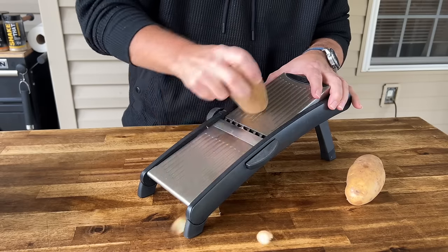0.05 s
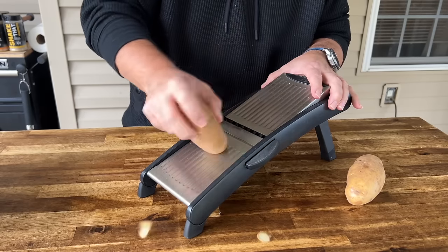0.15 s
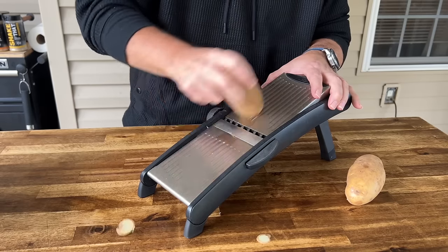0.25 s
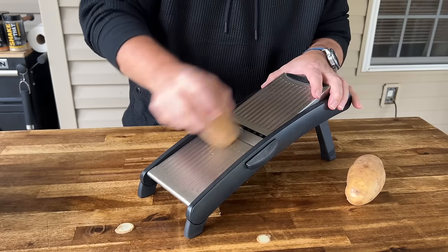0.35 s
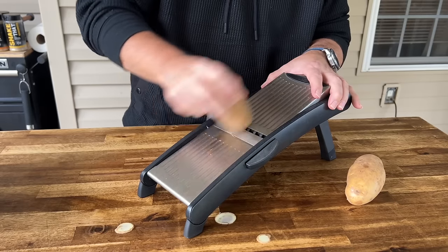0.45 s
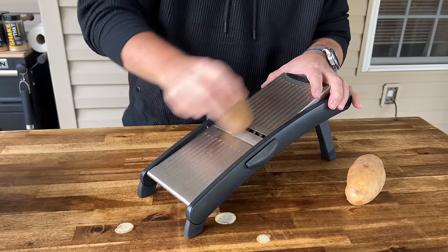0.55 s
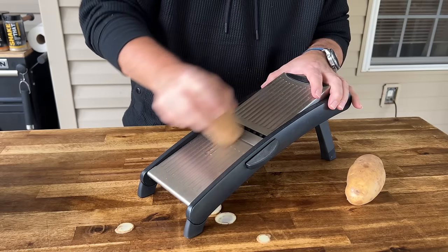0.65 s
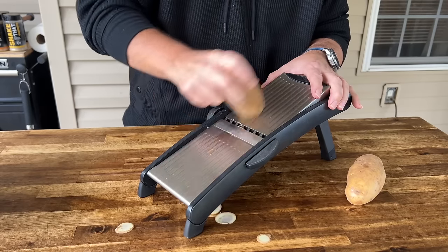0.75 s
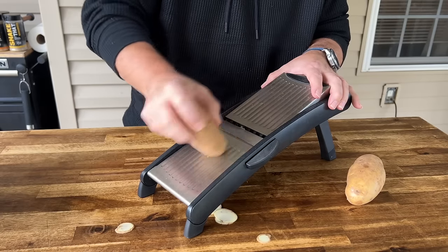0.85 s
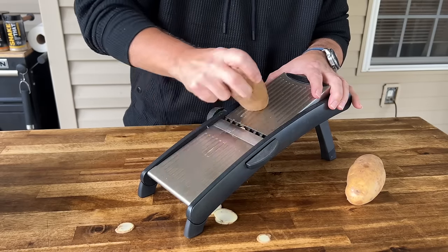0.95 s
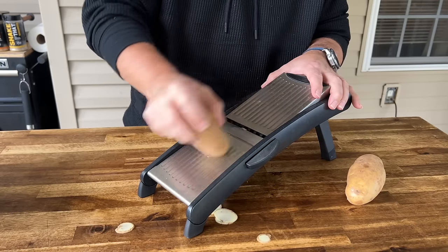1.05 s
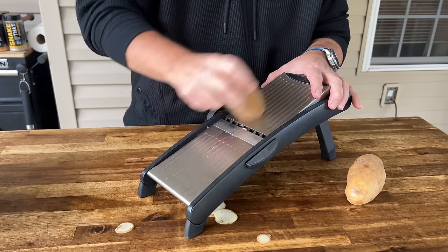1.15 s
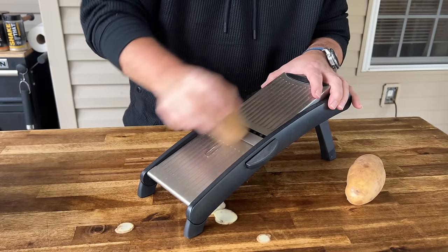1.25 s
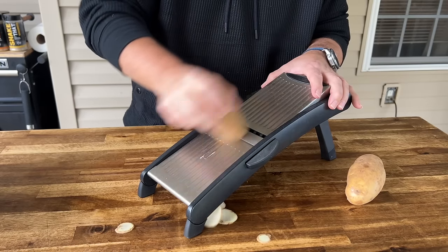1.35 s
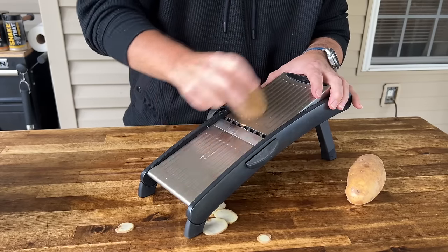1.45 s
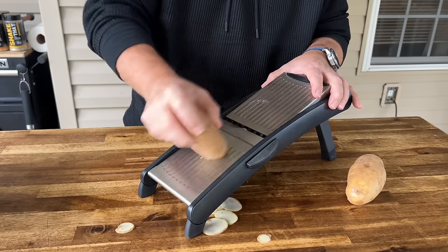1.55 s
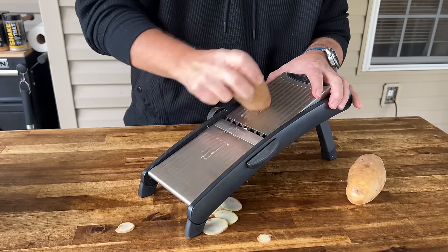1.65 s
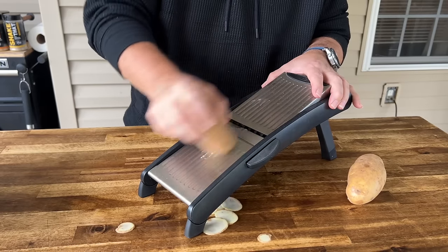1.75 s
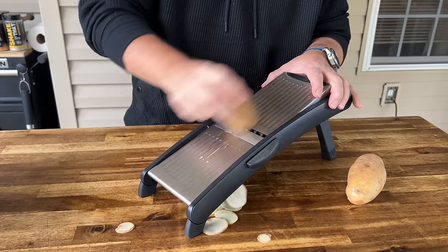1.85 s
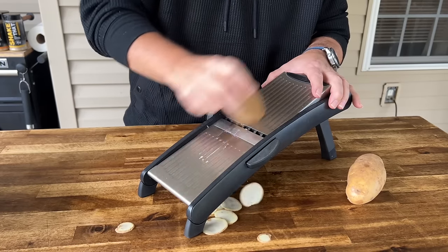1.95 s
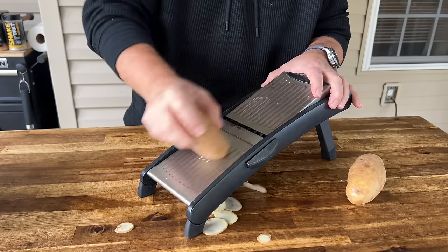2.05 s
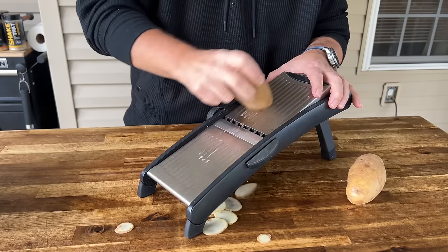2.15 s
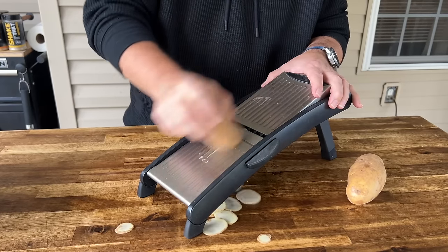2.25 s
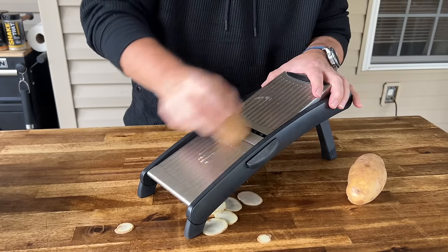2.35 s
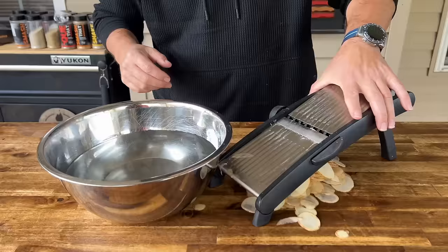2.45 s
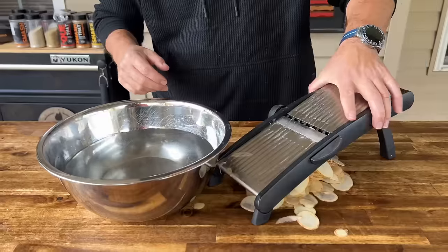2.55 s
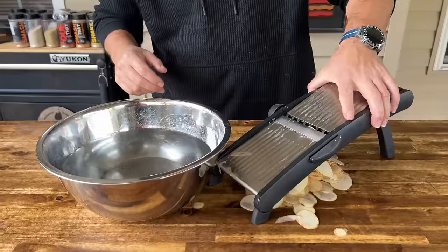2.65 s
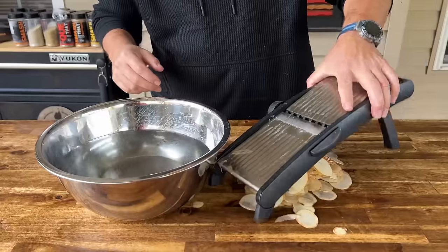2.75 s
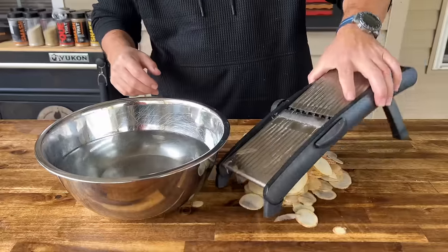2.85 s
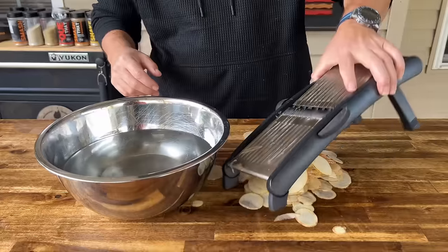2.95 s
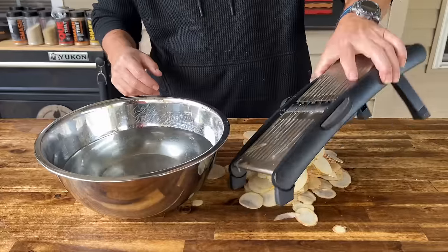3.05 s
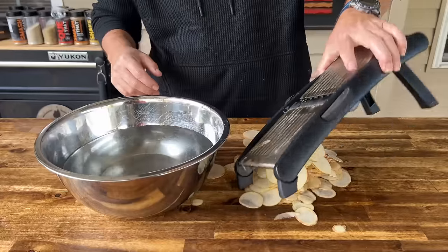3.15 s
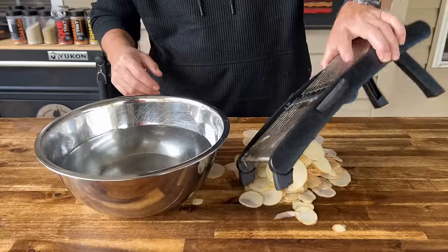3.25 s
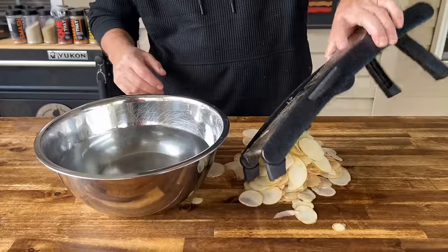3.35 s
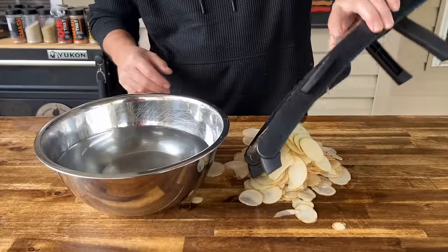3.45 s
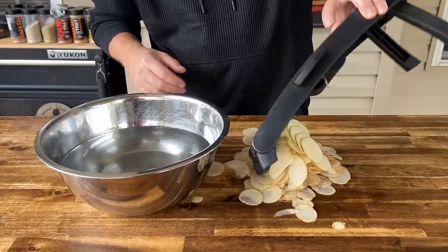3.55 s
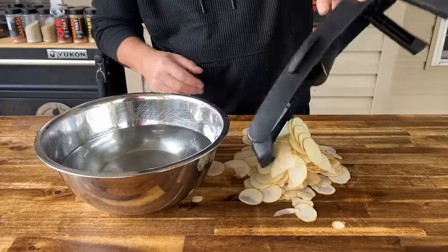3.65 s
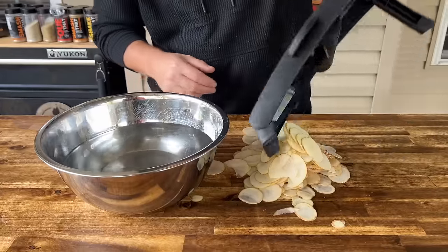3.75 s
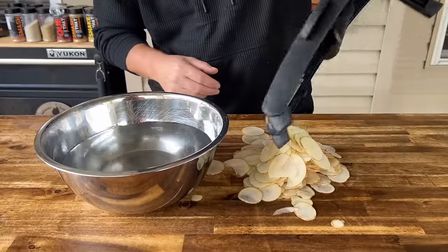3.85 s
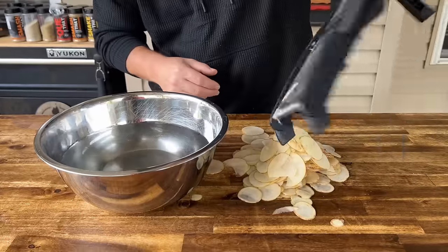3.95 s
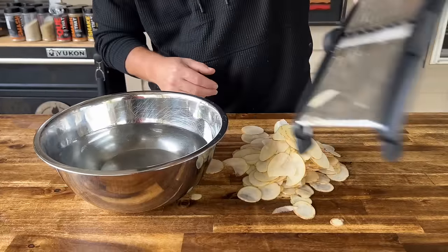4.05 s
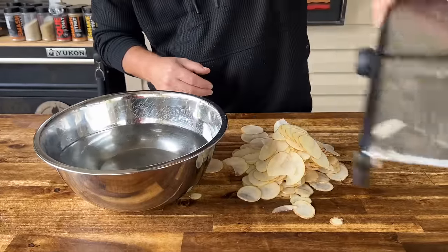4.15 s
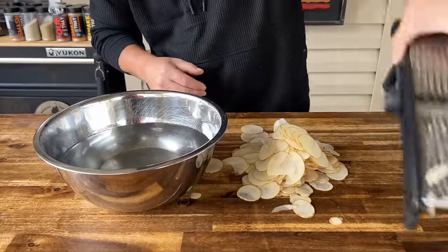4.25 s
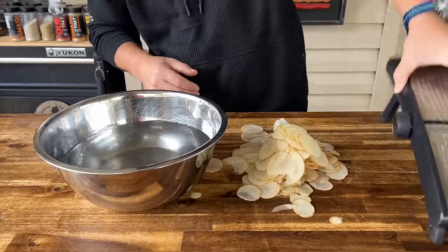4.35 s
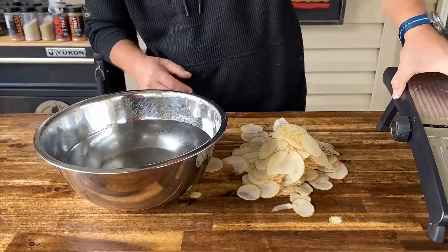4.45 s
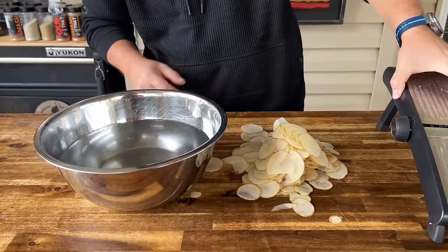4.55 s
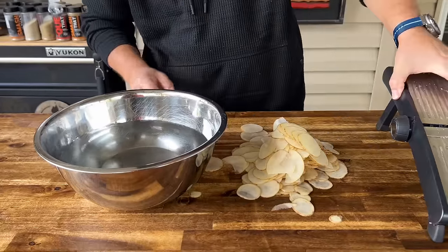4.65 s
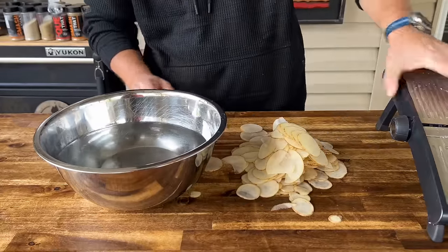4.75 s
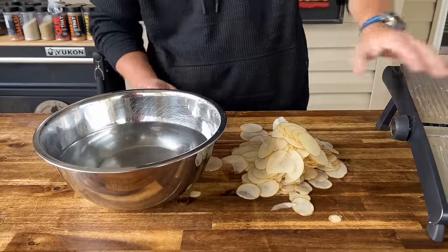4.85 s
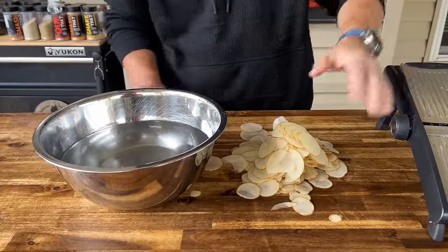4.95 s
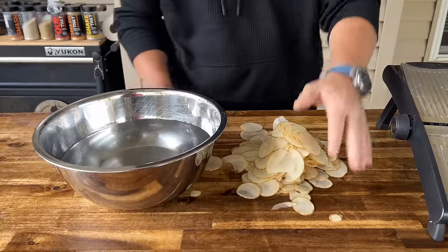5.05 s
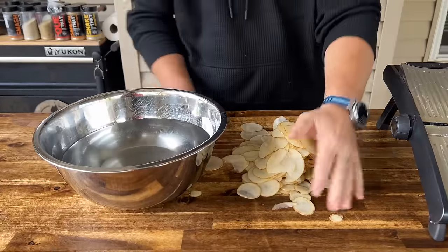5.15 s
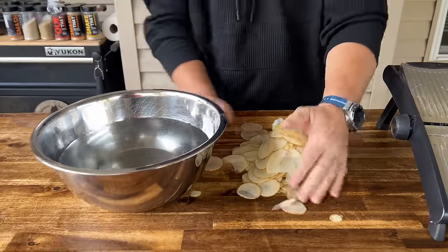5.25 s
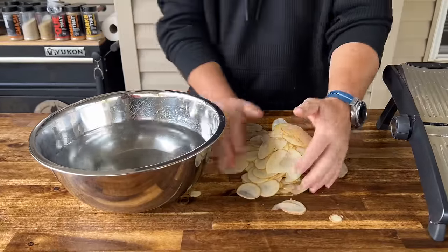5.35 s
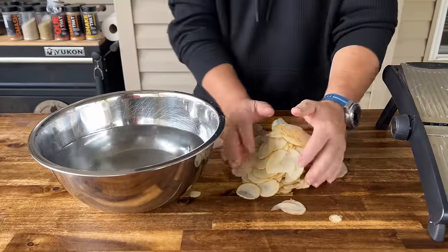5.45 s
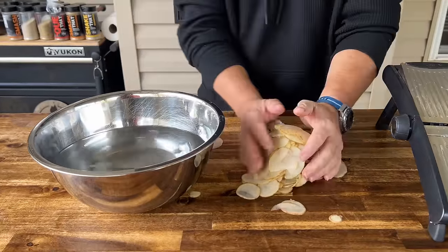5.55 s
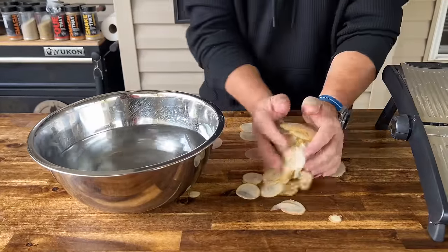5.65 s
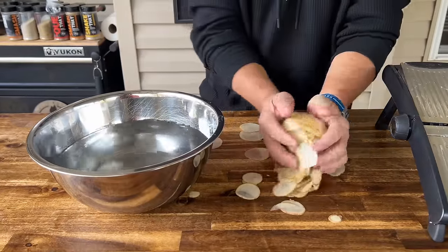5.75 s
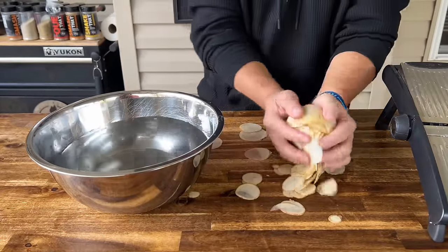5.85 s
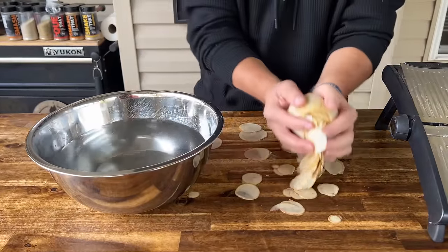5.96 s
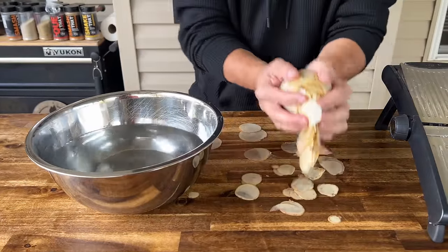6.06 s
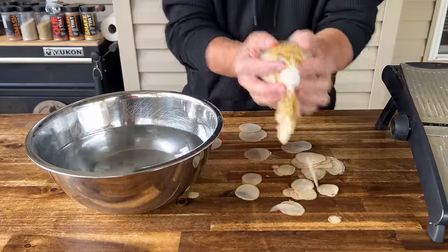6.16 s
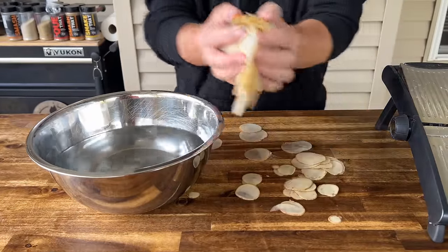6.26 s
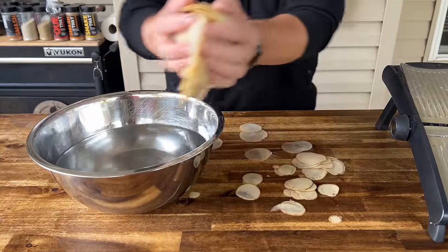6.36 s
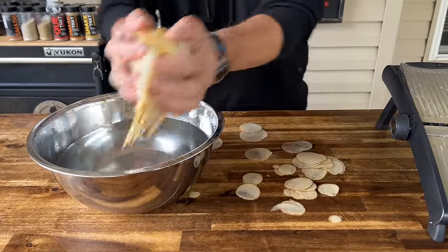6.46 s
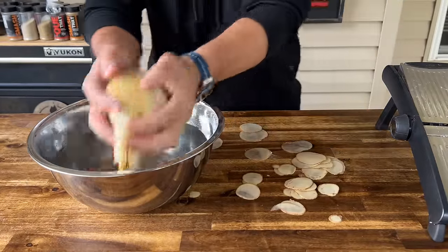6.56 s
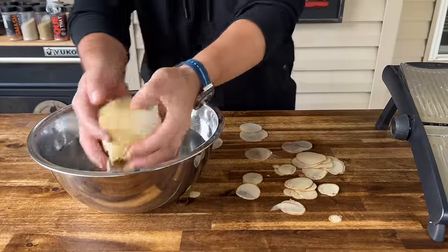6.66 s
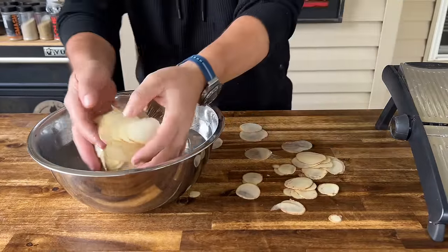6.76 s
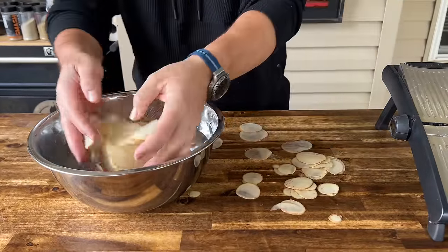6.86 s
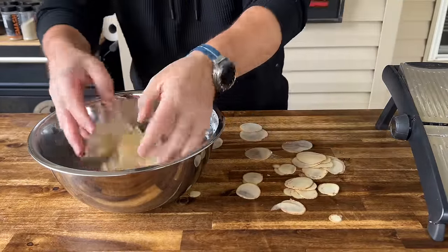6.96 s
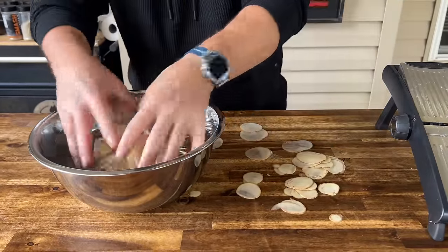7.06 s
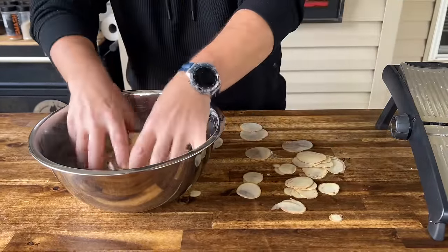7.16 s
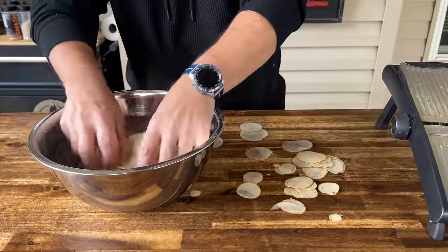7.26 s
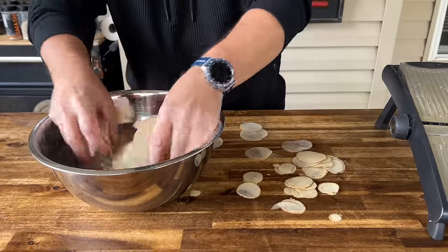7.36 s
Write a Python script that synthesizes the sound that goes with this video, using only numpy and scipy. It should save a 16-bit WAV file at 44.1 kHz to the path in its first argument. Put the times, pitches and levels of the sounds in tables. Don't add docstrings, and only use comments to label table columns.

```python
import sys
import numpy as np
from scipy import signal
from scipy.fft import rfft, irfft, next_fast_len
from scipy.io import wavfile
from scipy.ndimage import uniform_filter1d

SR = 44100
rng = np.random.default_rng(int(sys.argv[2]) if len(sys.argv) > 2 else 0)


def store_pcm(level_fs):
    pcm = np.round(np.clip(level_fs, -1, 1) * 32767).astype(np.int16)
    wavfile.write(sys.argv[1], SR, np.atleast_2d(pcm).T)


def undo_db(level):
    steps = np.asarray(level, float) / 20
    return 10 ** steps


N = 327266
SHOT_2_S = 2.49

# (frequency [Hz], level [dB])
RASP_SPECTRUM = [(150, -42), (500, -4), (900, -0.5), (1600, -10), (2600, -12.5), (3800, -5.5), (4400, -13),
                 (5000, -8.5), (6500, -15.5), (8500, -16), (11000, -19), (20000, -63)]
# (frequency [Hz], level [dB])
CUT_TINT = [(300, 2), (900, 2.5), (1600, 1), (2600, 2.5), (3700, 1.5), (4400, 3), (5200, 0.5), (8000, 1.5)]
# (frequency [Hz], level [dB])
FIZZ_SPECTRUM = [(3000, -57), (7000, -8), (9000, -1), (12500, -5.5), (15300, -2.5), (16500, -26.5)]
# (bite [s], let-go [s], bite [dB], let-go [dB], jolt [dB])
CUTS = [(0.1098, 0.129, -29.5, -15, -20.5), (0.3406, 0.357, -32.5, -13, -19),
        (0.567, 0.583, -29, -13.5, -20.5), (0.794, 0.81, -30.5, -16, -28.5),
        (1.0218, 1.0366, -33.5, -18, -32), (1.251, 1.264, -27, -19.5, -23),
        (1.493, 1.507, -29.5, -18.5, -30.5), (1.732, 1.744, -29, -19, -26.5),
        (1.983, 2, -27.5, -19.5, -23.5), (2.2413, 2.2543, -22, -18.5, -29)]
# (touch [s], clear [s], touch [dB], clear [dB])
RETURNS = [(0.004, 0.013, -26.5, -18), (0.231, 0.249, -25.5, -15), (0.46, 0.4804, -37.5, -15.5),
           (0.681, 0.702, -36, -21.5), (0.911, 0.929, -34.5, -20.5), (1.1263, 1.1582, -34, -25),
           (1.364, 1.3963, -19.5, -19), (1.607, 1.633, -40, -31.5), (1.855, 1.8795, -36, -25.5),
           (2.1007, 2.115, -14.5, -30), (2.359, 2.398, -43.5, -24)]
# (time [s], first level [dB], second level [dB])
KNOCKS = [(.003, -23.5, -20), (0.238, -39.5, -21), (.47, -30, -26.5), (.691, -31, -29), (.92, -31, -37),
          (1.133, -39, -30.5), (1.371, -36, -26), (1.624, -38, -28), (1.87, -30, -31), (2.108, -26, -28),
          (2.368, -53, -26.5)]
# (time [s], rasp [dB], fizz [dB], t60 [s])
SNAGS = [(.182, -40, -49.5, 0.061), (0.372, -12, -43.5, 0.016), (.413, -38, -37.5, 0.013),
         (.666, -34.5, -54, 0.044), (0.8622, -20, -35.5, 0.013), (1.281, -18, -42.5, .03),
         (2.383, -33.5, -48, 0.035)]
# (frequency [Hz], level [dB], t60 [s])
RAMP_MODES = [(191.8, -12, 0.24), (246, -17.5, 0.11), (342, -8.5, 0.083), (491, -8.5, 0.08),
              (630, -8.5, 0.046), (851, -9, 0.051), (981.5, -12.5, 0.076), (1390, -1.5, 0.0096)]
# (time [s], level [dB], frequency [Hz], upper mode [dB], t60 [s])
HUMS = [(0.004, -33, 407, -42.5, 0.09), (0.021, -23, 403, -42, 0.091), (0.131, -21, 407, -43, 0.087),
        (0.237, -25.5, 385, -42.5, 0.06), (0.256, -19, 409, -34, 0.066), (0.358, -20, 416, -25.5, 0.084),
        (0.469, -27, 384, -45, 0.059), (0.487, -19.5, 409, -50, 0.064), (0.583, -32, 419, -27, 0.19),
        (0.691, -28, 380, -48, 0.054), (0.708, -24.5, 409, -47, 0.076), (0.812, -22.5, 413, -26.5, 0.09),
        (0.92, -26, 394, -50, 0.059), (0.938, -26, 387, -49, 0.09), (1.041, -21, 409, -50, 0.072),
        (1.132, -30.5, 436, -44, 0.065), (1.149, -24, 402, -56, 0.052), (1.272, -20.5, 409, -34.5, 0.072),
        (1.369, -31.5, 417.6, -26, 0.2), (1.386, -24.5, 385, -46, 0.055), (1.509, -24, 410, -33, 0.053),
        (1.523, -27, 399, -50, 0.068), (1.624, -26, 395, -48, 0.068), (1.748, -24.5, 411, -27, 0.086),
        (1.87, -27, 385, -47, 0.088), (1.999, -22.5, 409, -28, 0.088), (2.108, -29.5, 428, -32, 0.043),
        (2.124, -26.5, 394, -45, 0.094), (2.257, -22, 414, -25.5, 0.1), (2.313, -44, 429, -59, 0.16),
        (2.387, -26.5, 389.5, -55, 0.1)]
# (frequency ratio, level [dB], t60 ratio)
HUM_SIDE_MODES = [(0.892, -11, 0.59), (0.462, -12, 1.3)]
# (frequency [Hz], level re rasp [dB], t60 [s])
BLADE_MODES = [(3600, -18.5, 0.022), (3820, -20.5, 0.036)]
BLADE_FREE_DB = [-6, 1, 6, 8, 5, 5, 5, 8, 4, -7, 6]
CUT_FIZZ_DB, CUT_END_FIZZ_DB = -39.5, -32
TOUCH_FIZZ_DB, CLEAR_FIZZ_DB = -18, -6
CUT_FIZZ_T60_RATIO, TOUCH_FIZZ_T60_RATIO, CLEAR_FIZZ_T60_RATIO = 0.93, 0.55, 0.61
FIZZ_RISE_S = 0.0018
JOLT_LAG_S, REBOUND_S, REBOUND_DB, KNOCK_GAP_S = 0.002447, 0.013, -5, 0.016
HARD_DB, HARD_T60_S, SOFTER_LONGER = -10, 0.026, 0.33
SLIDE_DB, RUMBLE_DB, SHAKE_DB, SHAKE_T60_S = -65, -47, -11.5, 0.12
LOAD_DB, LOAD_SHIFT = 3.5, 0.025
HUM_RISE_S, HUM_HOLD, UPPER_HZ, UPPER_T60_S = 0.0017, 1.58, 862, 0.037

# (time [s], crack peak [dB], frame ring [dB], steel tick [dB])
LANDINGS = [
    (4.3022, -18, -17.5, -42),
    (4.307, -18.5, -18, -45),
    (4.321, -12, -29, -37.5),
    (4.3493, -14.5, -31.5, -5),
    (4.4075, -13, -14, -29.5),
    (4.413, -20.5, -24, -23.5),
    (4.429, -9.5, -21, -35),
    (4.4406, -14, -29, -4.5),
    (4.679, -59.5, -46, -76.5),
]
# (frequency [Hz], level [dB])
CRACK_SPECTRUM = [(300, 5.5), (700, 1.5), (1200, 3), (1700, -1.5), (3000, -1), (4500, -6), (7000, -9.5),
                  (12000, -18.5), (15500, -25.5), (16300, -46)]
# (frequency [Hz], level [dB], t60 [s])
FRONT_MODES = [(350, -4.5, 0.11), (409, -1, 0.085), (472.8, -2, 0.041), (605, 5, 0.015), (890, -10.5, .04),
               (1235, -8, 0.028)]
# (frequency [Hz], level [dB], t60 [s])
REAR_MODES = [(214, -2.5, 0.085), (302, -11, 0.06), (401, -10.5, 0.19), (648, -1, 0.18), (694, -5, 0.067),
              (823, 2, 0.075), (970, 3.5, 0.087), (1263, -6.5, 0.057), (1530, -7.5, 0.026)]
# (frequency [Hz], level [dB])
STEEL_SPECTRUM = [(3000, -21), (5500, -8), (6400, 4), (7200, -5), (8500, -1.5), (11000, -4.5),
                  (12300, -2.5), (14500, -11), (15800, -12), (16800, -41)]
# (time [s], level [dB], frequency [Hz], t60 [s])
RINGS = [(4.303, -11.5, 392, 0.037), (4.303, -18, 628, 0.058), (4.304, -20, 300, 0.058),
         (4.316, -26, 409, 0.023), (4.35, -26, 397, 0.1), (4.321, -24, 2030, 0.04), (4.428, -24, 1180, .05),
         (4.4072, -13, 720, .04), (4.4072, -41, 930, 0.059), (4.4072, -19, 1190, .05),
         (4.428, -24, 677, 0.1), (4.428, -14.5, 1400, 0.041), (4.428, -20, 1650, 0.05),
         (4.4072, -32, 2210, .04), (4.436, -40, 920, 0.084), (4.44, -31.5, 2110, 0.083),
         (5.249, -27.5, 940, 0.017), (5.249, -44.5, 2010, 0.24), (5.249, -45, 2370, 0.094),
         (5.249, -42, 1768, 0.08), (5.25, -46, 3890, .05), (5.25, -48.5, 4580, 0.11),
         (5.264, -34, 129, 0.12), (5.273, -27.5, 613, 0.25), (5.3, -38.5, 700, 0.14),
         (5.28, -27, 416.4, 0.18), (5.266, -43, 1090, 0.05), (5.268, -47, 968, 0.12)]
# (time [s], peak [dB])
BUMPS = [(5.253, -31.5), (5.266, -29.5), (5.274, -23.5), (5.282, -24.5), (5.293, -27), (5.306, -43),
         (5.32, -30.5)]
# (frequency [Hz], level [dB], t60 [s])
COUNTER_MODES = [(97, -2, 0.17), (147, 4.5, 0.053), (302.5, -4, 0.26), (357, -5, 0.096), (483, -4.5, 0.062),
                 (673, -15.5, 0.077), (700, -8, 0.021), (830, -4, 0.029)]
REAR_STEEL_RATIO, STEEL_ECHO = 1, 0.61

# (start [s], length [s], rustle [dB], dull part relative [dB])
GESTURES = [(2.455, 0.89, -89, 22.5), (3.238, 0.66, -85.5, 12), (5.021, 0.54, -70.5, -21),
            (5.2, 0.16, -65.5, -11), (5.407, 0.38, -65, 4), (5.694, 0.29, -71.5, 13.5),
            (5.889, 0.85, -87.5, -9), (6.558, 0.23, -75, 13.5), (6.738, 0.36, -75, 23),
            (7.034, 0.39, -76, 18)]
# (frequency [Hz], level [dB])
RUB_SPECTRUM = [(1200, 7), (2500, -0.5), (4500, 1.5), (7000, -4), (11500, -2.5), (15500, -10.5),
                (16300, -35)]
# (time [s], peak [dB], centre [Hz], bright edge [dB])
TICKS = [(0.8599, -29.5, 1750, -47.5), (1.797, -37, 3800, -62.5), (2.667, -43.5, 3860, -79),
         (2.7804, -48, 5600, -61.5), (3.5909, -53, 4970, -89.5), (3.7542, -45.5, 3920, -89),
         (3.7937, -53, 3910, -77), (5.249, -25, 1990, -84), (5.8127, -43, 3740, -47),
         (5.8642, -50, 1770, -62), (5.886, -62, 2150, -82), (6.0771, -43, 4950, -75),
         (6.142, -50, 2415, -89), (6.277, -39.5, 3720, -65.5), (6.593, -51.5, 1807, -64.5),
         (6.8472, -54, 1870, -70), (6.8901, -47, 1990, -82.5), (6.956, -78, 1830, -64.5),
         (7.1213, -41, 4660, -61), (7.243, -43, 4700, -68.5), (7.3591, -55, 3810, -71)]
# (time [s], level [dB], low edge [Hz], high edge [Hz], length
# [s])
SCUFFS = [(3.66, -57, 2830, 3800, 0.097), (3.746, -63, 2180, 4400, 0.071), (4.601, -65, 4870, 5970, 0.14),
          (5.243, -48, 2800, 5560, 0.075), (5.75, -62, 2994, 6300, 0.11), (6.272, -70, 1800, 6500, 0.028),
          (6.656, -56, 2540, 10600, 0.051), (6.779, -68, 1820, 4700, 0.42), (7.26, -74, 1690, 2480, 0.018),
          (7.243, -63, 1836, 9500, 0.069)]
# (time [s], peak [dB], frequency [Hz], t60 [s])
PLOPS = [(6.772, -46.5, 605, 0.12), (6.785, -39.5, 910, 0.04), (6.875, -40, 1940, 0.02),
         (6.895, -24, 674, 0.0085), (6.901, -37, 760, 0.028), (6.914, -34.5, 770, 0.023),
         (6.939, -51.5, 1230, 0.024), (7.224, -48.5, 2670, 0.018), (7.24, -52, 1540, 0.036),
         (7.266, -47, 1970, 0.054)]
# (time [s], level [dB], frequency [Hz], t60 [s])
PIPS = [(2.36, -43.5, 2600, 0.022), (2.666, -53, 1286, 0.056), (2.666, -60, 3900, .03),
        (2.783, -61, 7950, .02), (2.97, -62, 1290, 0.12), (3.753, -57.5, 4230, 0.037),
        (3.753, -64, 8100, 0.027), (3.793, -58, 4310, .04), (5.218, -53.5, 5360, 0.066),
        (5.63, -54, 4900, 0.034), (5.69, -50, 4960, .03), (5.704, -57, 5060, .02),
        (5.768, -56, 4830, 0.022), (5.8314, -47, 3640, .02), (5.8643, -47.5, 1800, 0.018),
        (5.8892, -45.5, 8170, 0.014), (6.278, -53.5, 2110, 0.024), (6.81, -56, 1505, 0.013),
        (6.83, -59.5, 2900, .012), (6.888, -38.5, 1400, 0.018), (6.93, -63, 2400, 0.011),
        (6.997, -55, 1100, 0.02), (6.849, -57.5, 8010, 0.011), (6.952, -48, 7300, .012),
        (6.96, -53, 4090, .012), (6.967, -50, 5280, 0.02), (7.05, -62, 4400, 0.015),
        (7.242, -47.5, 3130, 0.017), (7.258, -60, 7800, .012), (7.326, -54, 1230, 0.019),
        (7.355, -55, 4160, 0.01), (7.376, -68, 7170, 0.015), (7.39, -58.5, 6500, .012)]
SOFT_ENDS = 0.66
TICK_T60_S = 0.03

# (peak [s], deep level [dB], build-up over 20 dB [s], upper puff relative [dB])
GUSTS = [(2.54, -40.5, 1.2, -11), (3.24, -38, 0.58, -4), (3.187, -25.5, 0.08, -6), (3.09, -35, 0.23, 0.5),
         (3.629, -47, 0.1, -8), (4.12, -50.5, -0.35, -6.5), (4.44, -45.5, -0.6, 6.5),
         (4.818, -42.5, 0.1, 0.5), (5.0, -62.5, -5, 4.5), (5.28, -64.5, 0, -1.5), (5.502, -53.5, 0.5, 0),
         (5.95, -65, 2, 3), (6.12, -57.5, 0, -16), (6.429, -54.5, -1, -5), (6.9, -54.5, 4.5, -9.5),
         (7.4, -54.5, 3.5, -2)]
DROP_RATIO = 0.38
# (time [s], level [dB], start [Hz], end [Hz], length [s])
CHIRPS = [(2.702, -56, 4080, 5780, 0.015), (3.641, -57, 4480, 5250, 0.016),
          (5.927, -58.5, 4500, 5650, 0.015), (6.013, -55.5, 4320, 5350, 0.022),
          (6.366, -70, 4400, 5050, 0.076), (6.991, -60, 4460, 4840, 0.017), (7.179, -61, 4540, 5420, 0.037)]
# (level [dB], start [Hz], end [Hz], length [s])
WHISTLE = (-57.5, 5601, 7890, 0.035)
# (level [dB], start [Hz], end [Hz], length [s])
PEEP = (-78, 3145, 2444, 0.195)
CHIRP_ECHO_S, CHIRP_HOARSE_HZ = 0.38, 416
WHISTLE_S, WHISTLE_ECHO_S, WHISTLE_HOARSE_HZ = 2.905, 0.32, 46
PEEP_S, PEEP_ECHO_S, PEEP_HOARSE_HZ = 6.333, 0.059, 25
GLIDE, PEEP_GLIDE = 2.6, 4.9
# (start [s], length [s], start [Hz], end [Hz], level [dB])
PHRASES = [(2.45, 0.55, 3080, 3080, -72.5), (2.899, 0.92, 3090, 2990, -79), (3.717, 0.5, 3600, 3220, -80),
           (4.153, 0.84, 3230, 3326, -71.5), (2.453, 0.23, 4530, 4640, -72),
           (2.794, 0.98, 5270, 5260, -81.5), (3.768, 0.37, 4690, 4700, -81.5),
           (4.154, 0.73, 4610, 4510, -71.5)]
THROB_DB, THROB_PER_S, WAVER_HZ, PHRASE_ENDS = -1, 5.5, 44.8, 0.5
# (frequency [Hz], density [dB per Hz])
AIR_SPECTRUM = [(59, -29.5), (100, -5), (215, -5), (841, -14.5), (1380, -22), (1730, -22.5), (2680, -34),
                (4680, -37), (8520, -54), (9450, -64.5), (14000, -58)]
AIR_DB = -48

# (frequency [Hz], likeness [0..1])
LIKENESS = [(60, 0.93), (200, 0.9), (500, 0.5), (1000, 0.29), (4000, 0.16), (7000, 0.55), (16000, 1.0)]
# (frequency [Hz], t60 [s])
PORCH_T60 = [(100, 1), (300, 0.66), (700, 0.25), (1500, 0.24), (4000, 0.25), (8000, 0.22), (16000, 0.13)]
# (frequency [Hz], left lead [rad])
PORT_LEAD = [(0, 0), (1300, -.4), (2400, 1.0), (3700, 1.5), (5400, 1.2), (6800, 0), (9300, -3.06),
             (10900, -3.23), (13000, -6.28), (14600, -6.9), (16600, -9.42)]
# (frequency [Hz], left minus right [dB])
PORT_BALANCE = [(60, 1), (500, 1), (1200, -1.5), (2700, 3), (4200, 4), (6400, 3.5), (9000, 0), (16000, 0)]
SWAY_S = 0.37
OPEN_HZ = 470
PARTED_BELOW_HZ = 8970


def slicing():
    strokes, jolts = contacts()
    size = round(SHOT_2_S * SR)
    grit = wide(RASP_SPECTRUM, share=0.84, grain_db=2.5, per_s=7000, size=size)
    first, last = len(SNAGS), len(SNAGS) + 2 * len(CUTS)

    def level(rows):
        lasting = [(s, db - 11.0, 1.15 * t60) for s, db, t60, _, _ in rows]
        return envelope(lasting, 0.0019, bend=1.553)[:size]

    cut_grit = shaped(grit, lambda hz: undo_db(read(CUT_TINT, hz)))
    rasp = level(strokes[:first] + strokes[last:]) * grit + level(strokes[first:last]) * cut_grit
    fizz = parted(noise(FIZZ_SPECTRUM, grain_db=3.0, per_s=15000, size=size), same=0.61)
    fizz_rows = [(s, db + 5.5, t60) for s, _, _, db, t60 in strokes]
    rasp += envelope(fizz_rows, FIZZ_RISE_S, bend=0.98)[:size] * fizz
    slide = undo_db(SLIDE_DB) * (grit + 0.45 * fizz)
    shakes = [(s + 0.02, db + SHAKE_DB, SHAKE_T60_S) for s, db in jolts]
    shake = undo_db(RUMBLE_DB) + envelope(shakes, 0.019)[:size]
    rumble = shake * noise(band(79, 114.7), size=size)
    return rasp + ramp(jolts, size) + (hum() + blade())[:size] + slide + rumble


def contacts():
    rows, jolts = [], []
    for bite, end, bite_db, end_db, jolt_db in CUTS:
        rows.append((bite, bite_db, CUT_FIZZ_DB, CUT_FIZZ_T60_RATIO))
        rows.append((end, end_db, CUT_END_FIZZ_DB, CUT_FIZZ_T60_RATIO))
        jolt = end + JOLT_LAG_S
        jolts += [(jolt, jolt_db), (jolt + REBOUND_S, jolt_db + REBOUND_DB)]
    for touch, clear, touch_db, clear_db in RETURNS:
        rows.append((touch, touch_db, touch_db + TOUCH_FIZZ_DB, TOUCH_FIZZ_T60_RATIO))
        rows.append((clear, clear_db, clear_db + CLEAR_FIZZ_DB, CLEAR_FIZZ_T60_RATIO))
    for s, first_db, second_db in KNOCKS:
        jolts += [(s, first_db), (s + KNOCK_GAP_S, second_db)]
    strokes = [(s, db, t60, fizz_db, t60) for s, db, fizz_db, t60 in SNAGS]
    for s, db, fizz_db, ratio in rows:
        t60 = HARD_T60_S * undo_db(SOFTER_LONGER * (HARD_DB - db))
        strokes.append((s, db, t60, fizz_db, ratio * t60))
    return strokes, jolts


def ramp(jolts, size):
    out = 0
    for k in range(3):
        load = 2 * rng.random((len(RAMP_MODES), 2)) - 1
        loaded = [(hz * (1 + LOAD_SHIFT * a), db + LOAD_DB * b, t60)
                  for (hz, db, t60), (a, b) in zip(RAMP_MODES, load)]
        rows = [(s, db - 5.0) for s, db in jolts[k::3]]
        push = blows(rows, push_s=0.00022, chatter=0.086, chatter_t60=0.045)
        out = out + ring(push[:size], loaded)[:size]
    return out


def hum():
    low = 0
    for ratio, mode_db, last in [(1, 0.01, 1)] + HUM_SIDE_MODES:
        rows = [(s, db + mode_db - 3.0, ratio * hz, 0.83 * last * t60) for s, db, hz, _, t60 in HUMS]
        low = low + tones(rows, HUM_RISE_S, HUM_HOLD)
    upper = [(s, db - 1.0, UPPER_HZ * hz / 410, UPPER_T60_S) for s, _, hz, db, _ in HUMS]
    return low + tones(upper, 0.0013, 1.45)


def blade():
    rows = [(clear, clear_db + db + free_db, hz, t60)
            for (_, clear, _, clear_db), free_db in zip(RETURNS, BLADE_FREE_DB)
            for hz, db, t60 in BLADE_MODES]
    return tones(rows, 0.0011, 1.14)


def set_down():
    cracks = [(s, db - 4.5, 0.05) for s, db, _, _ in LANDINGS]
    crack = envelope(cracks, 0.00082) * wide(CRACK_SPECTRUM, share=1.0, grain_db=2.5, per_s=11000)
    pushes = [(s, db + 2.0) for s, _, db, _ in LANDINGS]
    front = ring(blows(pushes[:4], push_s=0.00076, chatter=0.076, chatter_t60=0.038), FRONT_MODES)
    rear = ring(blows(pushes[4:], push_s=0.00048, chatter=0.024, chatter_t60=0.065), REAR_MODES)
    steel_rows = [(s, db + 0.6, 0.012) for s, _, _, db in LANDINGS]
    steel = envelope(steel_rows, 0.00059, bend=1.0) * parted(noise(STEEL_SPECTRUM, grain_db=-1.5), same=0.28)
    rear_steel = shaped(steel, lambda hz: undo_db(read(STEEL_SPECTRUM, hz / REAR_STEEL_RATIO)
                                              - read(STEEL_SPECTRUM, hz)))
    steel = np.where(np.arange(N) < LANDINGS[4][0] * SR - 200, steel, rear_steel)
    boom = envelope([(4.42, -36, 1)], 0.0081, length=0.5) * noise(band(280, 250))
    bumps = ring(blows(BUMPS, push_s=0.00076, chatter=0.068, chatter_t60=0.036), COUNTER_MODES)
    return steel, crack + front + rear + boom + tones(RINGS, 0.0013, 1.0) + bumps


def hands():
    return rubbing() + ticks() + scuffs() + plops() + tones(PIPS, 0.00031, 1.0)


def rubbing():
    bright = wide(RUB_SPECTRUM, share=1.0, grain_db=2.0, per_s=15000)
    dull = noise(band(290, 2700), grain_db=2.0, per_s=1200)
    rub = bright * sum(swell(s, length, db + 8.5) for s, length, db, _ in GESTURES)
    rub += dull * sum(swell(s, length, db + dull_db - 6.5) for s, length, db, dull_db in GESTURES)
    return rub * undo_db(1.7 * evened(uniform_filter1d(rng.standard_normal(N), size=900)))


def ticks():
    out, size = np.zeros(N), round(0.3 * SR)
    for s, db, hz, edge_db in TICKS:
        burst = rng.standard_normal(size)
        tuned = evened(signal.lfilter(*signal.iirpeak(hz, 2.5, SR), burst))
        edge = np.gradient(burst)
        tick = undo_db(db - 4.0) * tuned + undo_db(edge_db + 13.5) * edge
        add(out, s, tick * dying(TICK_T60_S, 0.0013))
    return out


def scuffs():
    out, t = np.zeros(N), np.arange(round(0.3 * SR)) / SR
    for s, db, lo_hz, hi_hz, length in SCUFFS:
        grains = rng.standard_normal(len(t)) * undo_db(10.0 * np.minimum(rng.exponential(1, len(t)), 4))
        sos = signal.butter(2, [lo_hz, hi_hz], "band", fs=SR, output="sos")
        scuff = evened(signal.sosfilt(sos, grains))
        add(out, s, undo_db(db) * scuff * np.sin(np.pi * np.clip(t / length, 0, 1) ** 0.28) ** 2)
    return out


def plops():
    out, t = np.zeros(N), np.arange(round(0.3 * SR)) / SR
    for s, db, hz, t60 in PLOPS:
        add(out, s, undo_db(db) * np.sin(2 * np.pi * hz * t * (1 + 4.03 * t)) * dying(t60, 0.00013))
    return out


def outdoors():
    return undo_db(AIR_DB - 11.5) * noise(AIR_SPECTRUM) + wind() + insects() + birds()


def wind():
    t = np.arange(0, N + 64, 64) / SR
    s, db, build, upper_db = np.transpose(GUSTS)[..., None]
    fall_db = 20 * np.maximum((s - t) / build, (t - s) / (DROP_RATIO * build))
    push = undo_db(db - fall_db) * (t > SHOT_2_S)

    def total(x):
        return np.interp(np.arange(N) / SR, t, np.sqrt((x ** 2).sum(0)))

    deep = total(push) * noise(band(52, 76))
    return deep + total(push * undo_db(upper_db)) * noise(band(76, 140), grain_db=3.0, per_s=120)


def insects():
    out = np.zeros(N)
    for s, length, start_hz, end_hz, db in PHRASES:
        hz = np.linspace(start_hz, end_hz, round(length * SR))
        rate = 1 + 0.5 * np.sin(np.arange(len(hz)) / SR * 11 + s)
        sway = np.sin(2 * np.pi * THROB_PER_S * np.cumsum(rate) / SR + start_hz)
        hz = hz + WAVER_HZ * np.roll(sway, 900)
        a, b = rng.standard_normal((2, SR + SR // 4))[:, :len(hz)]
        fuzz = signal.lfilter([1], [1, -np.exp(-np.pi * 170 / SR)], a + 1j * b)
        song = (fuzz * np.exp(2j * np.pi * np.cumsum(hz[:len(a)]) / SR)).real
        level = undo_db(db + THROB_DB * sway[:len(a)])
        add(out, s, level * evened(song) * signal.windows.tukey(len(a), PHRASE_ENDS))
    return out


def birds():
    out = np.zeros(N)
    notes = [(*row, CHIRP_ECHO_S, CHIRP_HOARSE_HZ, GLIDE) for row in CHIRPS]
    notes.append((WHISTLE_S, *WHISTLE, WHISTLE_ECHO_S, WHISTLE_HOARSE_HZ, GLIDE))
    notes.append((PEEP_S, *PEEP, PEEP_ECHO_S, PEEP_HOARSE_HZ, PEEP_GLIDE))
    for s, db, start_hz, end_hz, length, t60, hoarse_hz, glide in notes:
        u = np.linspace(0, 1, round(length * SR))
        waver = hoarse_hz * evened(uniform_filter1d(rng.standard_normal(SR), size=40))[:len(u)]
        pitch = end_hz + (start_hz - end_hz) * (1 - u) ** glide + waver
        note = np.sin(2 * np.pi * np.cumsum(pitch) / SR) * signal.windows.tukey(len(u), 0.4)
        echoes = signal.fftconvolve(note, rng.standard_normal(SR // 2) * dying(t60, 0.0072, 0.5))
        add(out, s, undo_db(db) * note)
        add(out, s, undo_db(db - 4.5) * echoes / abs(echoes).max() * 3)
    return out


def porch(x, count):
    def tail():
        hz, t, z = signal.stft(rng.standard_normal(SR // 2), SR, nperseg=256)
        decay = undo_db(-60 * t / read(PORCH_T60, hz)[:, None])
        taps = np.pad(signal.istft(z * decay, SR, nperseg=256)[1], (66, 0))
        return taps / np.linalg.norm(taps)

    size = x.shape[-1]
    phase = np.arange(size) / SR / SWAY_S + np.arange(count)[:, None] / count
    turns = abs(np.cos(np.pi * phase)) + 1e-9
    turns /= np.linalg.norm(turns, axis=0)
    return sum(signal.fftconvolve(x[:1] * turn, spread(tail), axes=1)[:, :size] for turn in turns)


def blows(rows, push_s, chatter, chatter_t60):
    firm = np.zeros(N)
    for s, db in rows:
        add(firm, s, undo_db(db) * np.hanning(round(push_s * SR) + 3) * 2 / (push_s * SR + 2))
    loose = envelope([(s, db, chatter_t60) for s, db in rows], 0.0033)
    return firm + chatter * loose * rng.standard_normal(N)


def ring(drive, modes):
    t, body = np.arange(round(0.4 * SR)) / SR, 0
    for k, (hz, db, t60) in enumerate(modes):
        body = body + (-1) ** k * undo_db(db - 60 * t / np.clip(t60, 0.01, 0.4)) * np.sin(2 * np.pi * hz * t)
    return signal.oaconvolve(drive, body / abs(body).max())[:N]


def tones(rows, rise, bend):
    out, t = np.zeros(N), np.arange(round(0.3 * SR)) / SR
    for s, db, hz, t60 in rows:
        add(out, s, undo_db(db) * np.sin(2 * np.pi * hz * t) * dying(t60, rise, 0.3, bend))
    return out


def dying(t60, rise=0.001, length=0.3, bend=0.75):
    t = np.arange(round(length * SR)) / SR
    return undo_db(-60 * (t / max(t60, 0.004)) ** bend) * (1 - np.exp(-t / rise))


def envelope(rows, rise, bend=1.0, length=0.3):
    out = np.zeros(N)
    for s, db, t60 in rows:
        add(out, s - rise, undo_db(db) * dying(t60, rise, length, bend))
    return out


def swell(start, length, db):
    out = np.zeros(N)
    add(out, start, undo_db(db) * signal.windows.tukey(round(length * SR), np.clip(SOFT_ENDS, 0, 1)))
    return out


def noise(points, grain_db=0, per_s=SR, size=N):
    grains = rng.standard_normal(size) * undo_db(grain_db * np.minimum(rng.exponential(1, size), 4))
    grains = grains * (rng.random(size) < per_s / SR)
    return evened(shaped(grains, lambda hz: undo_db(read(points, hz))))


def wide(points, share, **grain):
    pair = spread(lambda: noise(points, **grain))
    return share * pair + (1 - share) * pair[0]


def spread(make):
    a, b = make(), make()

    def same(hz):
        return np.clip(np.maximum(read(LIKENESS, hz), hz / 9000), 0, 0.999)

    return np.array([a, shaped(a, same) + shaped(b, lambda hz: np.sqrt(1 - same(hz) ** 2))])


def parted(x, same):
    def differs(hz):
        return np.clip(1 - same, 0, 1) / (1 + (hz / PARTED_BELOW_HZ) ** 20)

    other = shaped(np.roll(x, 5000), lambda hz: np.sqrt(1 - (1 - differs(hz)) ** 2))
    return np.array([x, shaped(x, lambda hz: 1 - differs(hz)) + other])


def band(lo_hz, hi_hz):
    return [(lo_hz / 4, -70), (lo_hz / 2, -18.0), (lo_hz, 0), (hi_hz, 0), (hi_hz * 2, -28.0), (hi_hz * 20, -130)]


def shaped(x, gain_of_hz):
    size = next_fast_len(x.shape[-1] + 4096)
    return irfft(rfft(x, size) * gain_of_hz(np.fft.rfftfreq(size, 1 / SR)), size)[..., :x.shape[-1]]


def read(points, hz):
    f, value = np.transpose(points)
    return np.interp(np.log(hz + 1), np.log(f + 1), value)


def evened(x):
    return x / np.sqrt(np.mean(x ** 2) + 1e-20)


def add(mix, s, sound):
    part = mix[round(s * SR):][:len(sound)]
    part += sound[:len(part)]


def scene():
    size = round(SHOT_2_S * SR)
    slicer, (steel, thuds) = slicing(), set_down()
    rest = thuds + hands()

    def kept_in(hz):
        return hz ** 2 / (hz ** 2 + OPEN_HZ ** 2)

    fade = np.clip((size - np.arange(size)) / SR / 0.0023, 0, 1)
    first = (slicer + undo_db(-8.5) * porch(shaped(slicer, kept_in), count=3)) * fade
    rest_echo = porch(shaped(rest + STEEL_ECHO * steel, kept_in), count=1)
    second = rest + steel + undo_db(-6.0) * rest_echo
    return np.pad(first, ((0, 0), (0, N - size))) + second + spread(outdoors)


def roll_off(x):
    return signal.sosfilt(signal.butter(12, 16830, fs=SR, output="sos"), x)


def record(dry):
    def lead(hz):
        phase = np.interp(hz, *np.transpose(PORT_LEAD))
        return np.exp(0.5j * phase) * undo_db(read(PORT_BALANCE, hz) / 2)

    ports = np.array([shaped(dry[0], lead), shaped(dry[1], lambda hz: 1 / lead(hz))])
    return roll_off(ports)


dry = scene()
out = record(dry)
store_pcm(out)
```